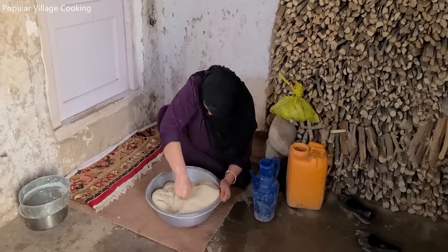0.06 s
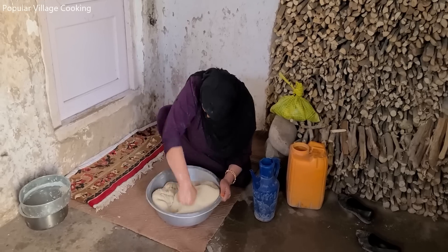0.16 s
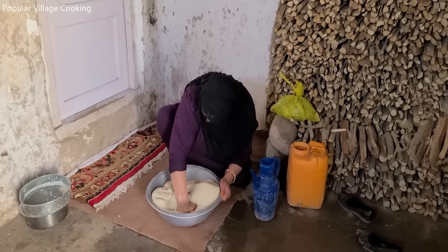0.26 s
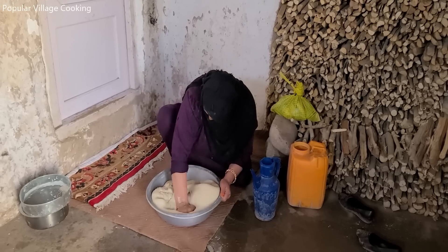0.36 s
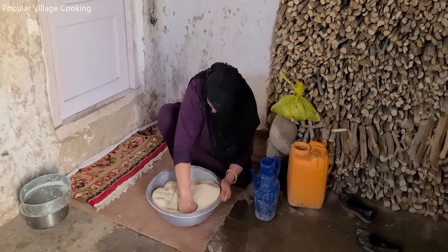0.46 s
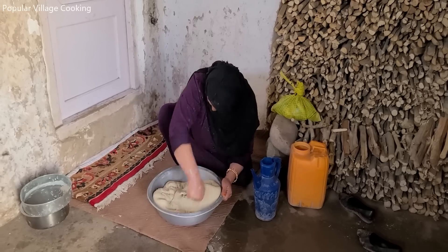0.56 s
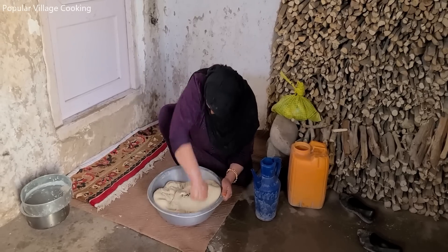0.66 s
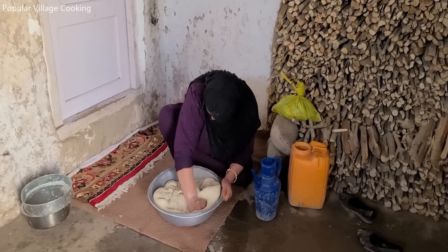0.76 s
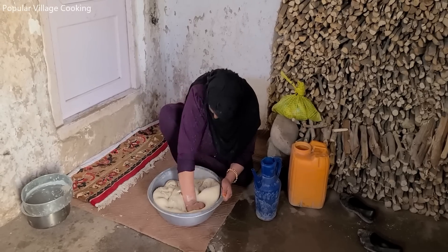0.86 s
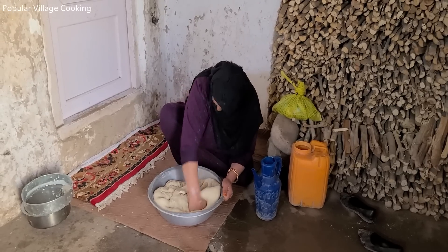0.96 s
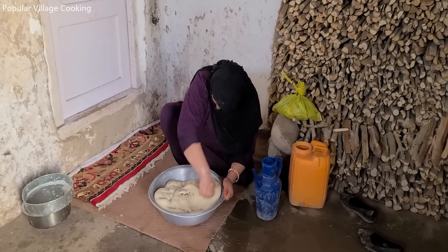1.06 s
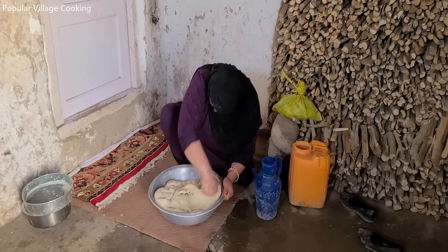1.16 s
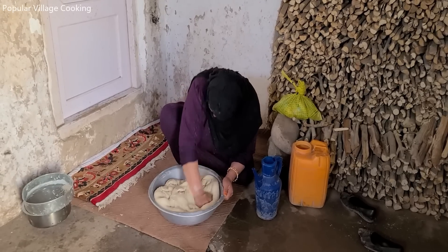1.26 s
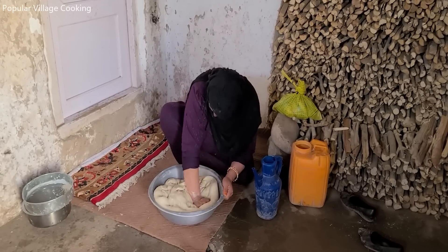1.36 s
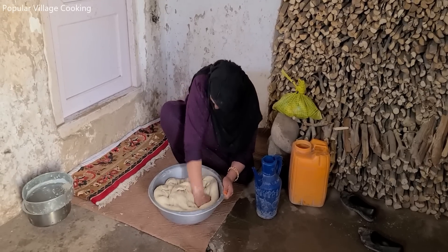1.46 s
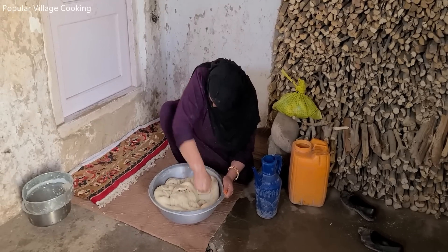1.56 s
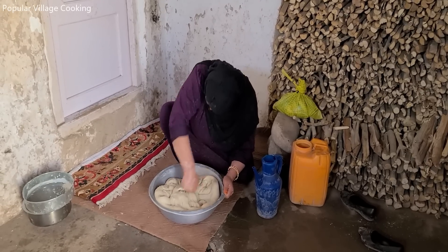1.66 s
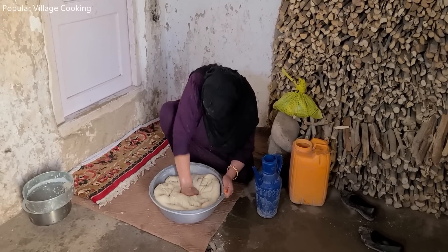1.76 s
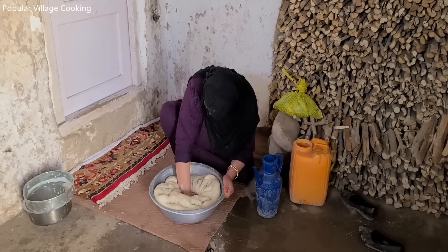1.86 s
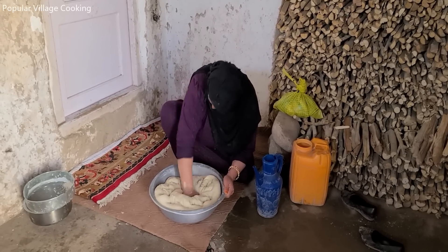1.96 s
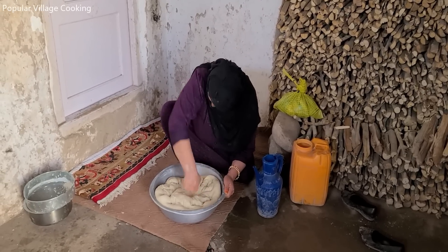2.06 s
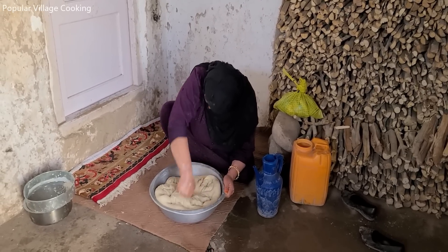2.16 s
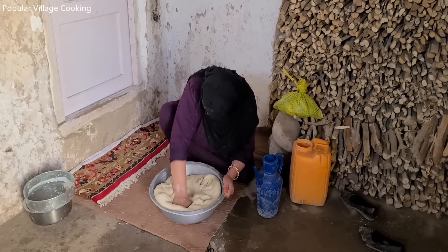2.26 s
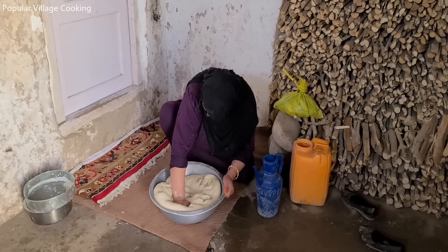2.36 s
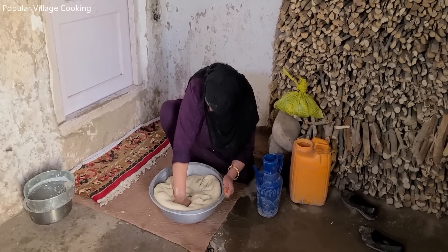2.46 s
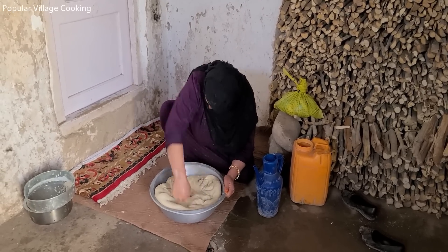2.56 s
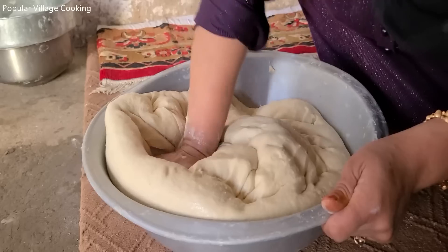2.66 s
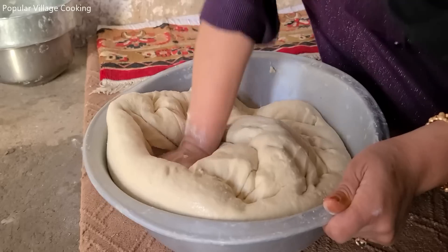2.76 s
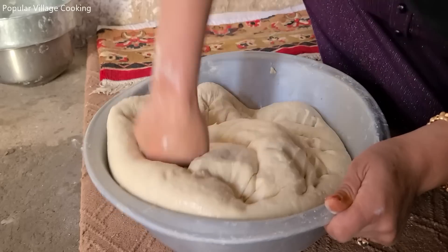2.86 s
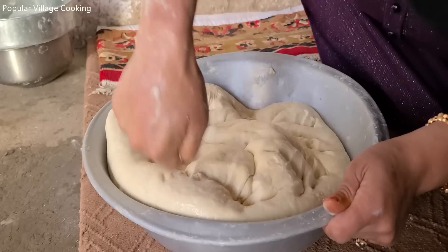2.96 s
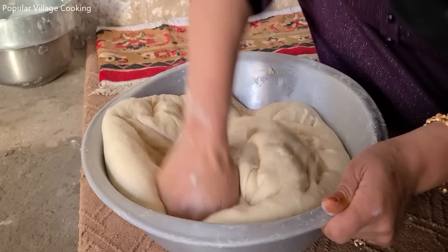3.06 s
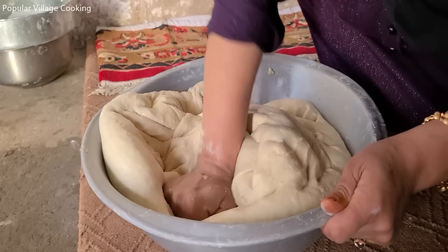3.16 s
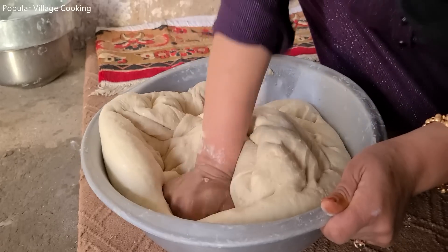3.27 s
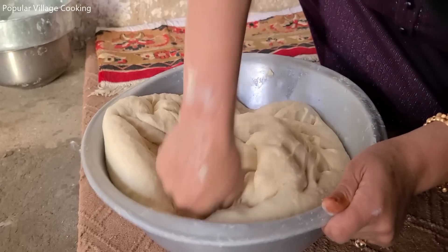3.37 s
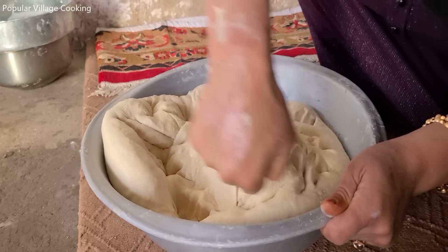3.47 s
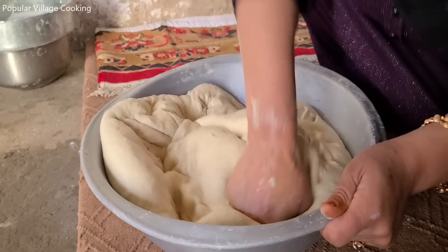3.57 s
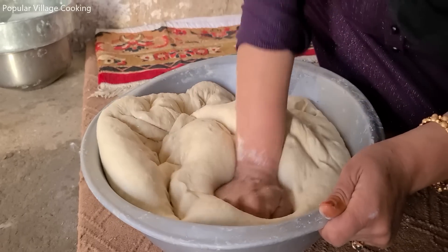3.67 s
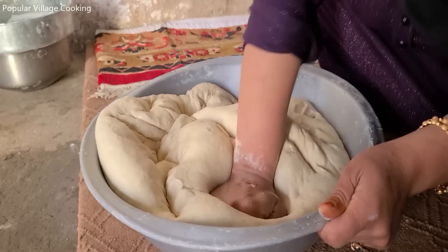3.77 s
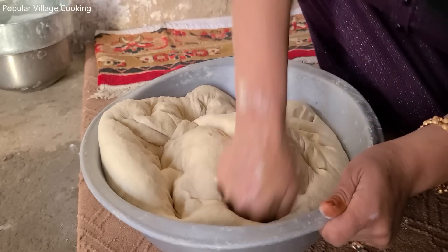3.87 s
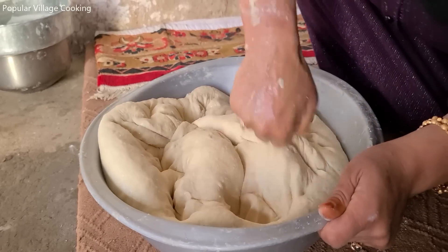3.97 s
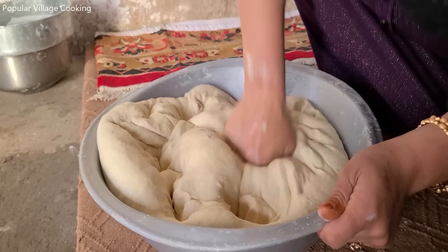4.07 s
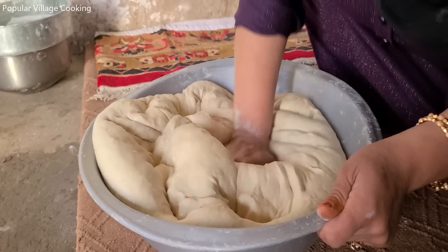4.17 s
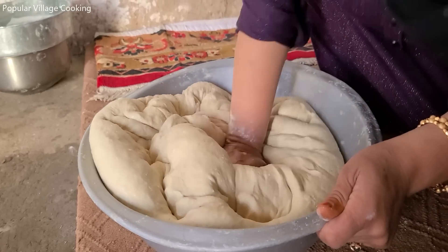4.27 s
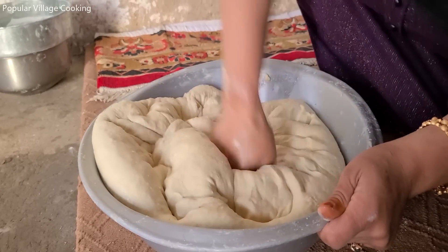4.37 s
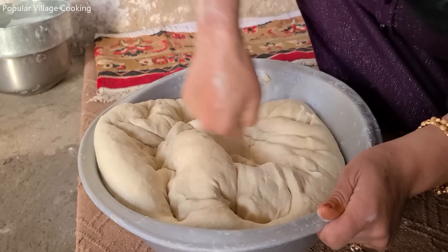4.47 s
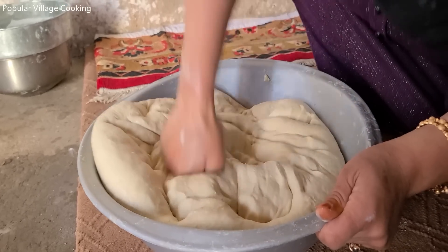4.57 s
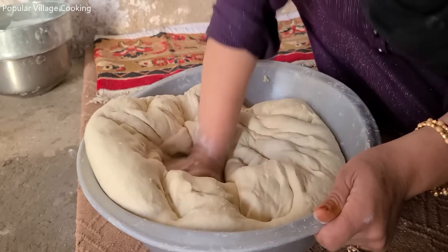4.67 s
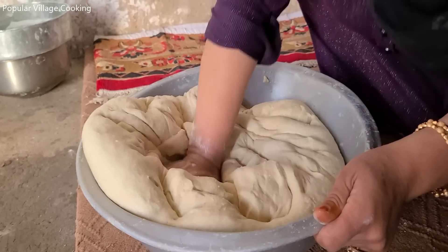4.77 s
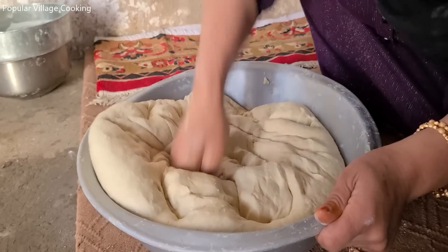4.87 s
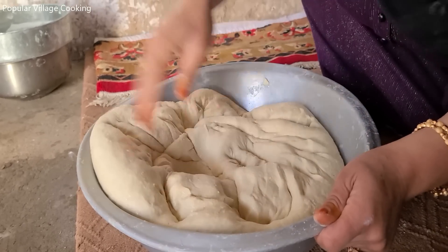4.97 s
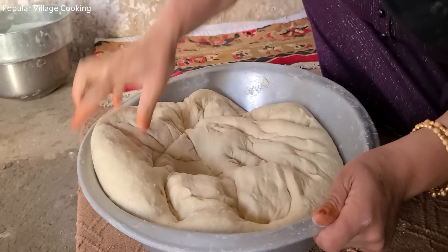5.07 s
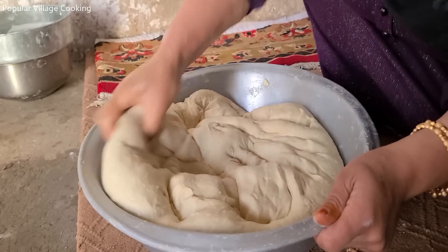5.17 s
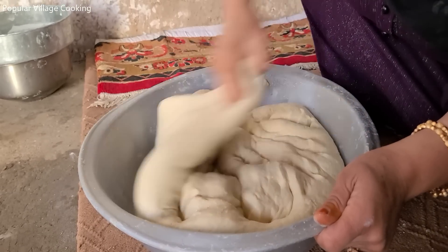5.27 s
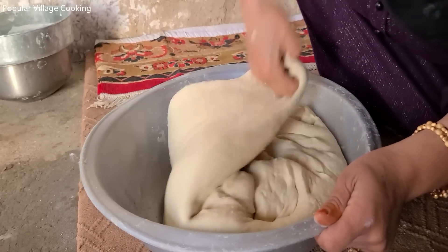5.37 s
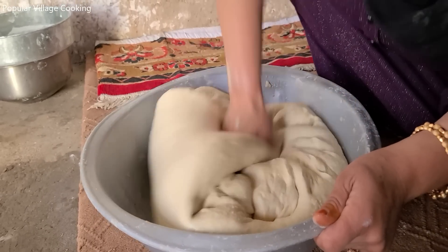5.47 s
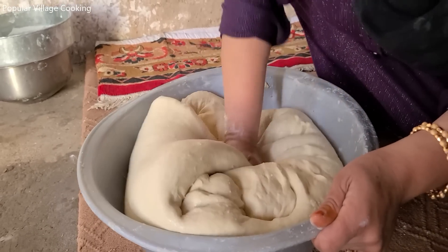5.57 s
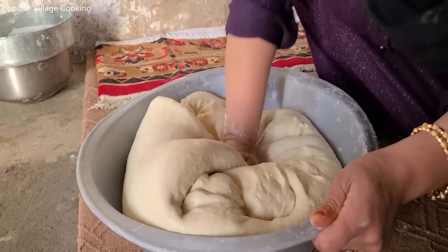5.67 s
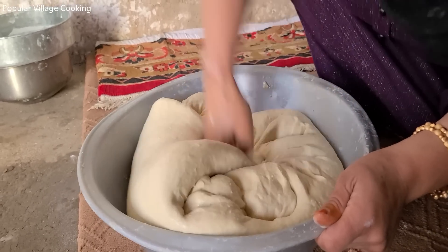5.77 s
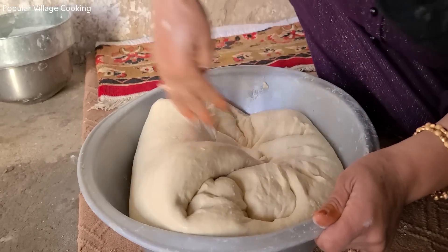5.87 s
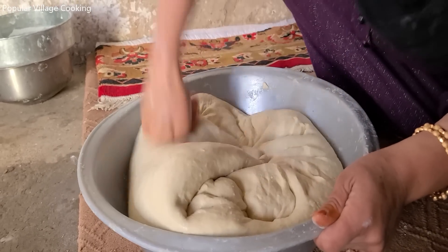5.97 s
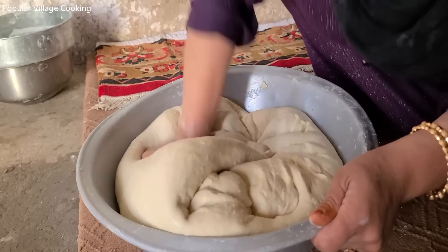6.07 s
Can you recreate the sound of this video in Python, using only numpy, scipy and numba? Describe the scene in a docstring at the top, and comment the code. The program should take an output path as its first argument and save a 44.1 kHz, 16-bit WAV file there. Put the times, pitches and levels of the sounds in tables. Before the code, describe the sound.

Soft, distant squelches and pops come in a steady rhythm as dough is punched in a metal basin outdoors. Almost halfway through, the sound cuts out for an instant and returns close to the microphone. Now the wet blows are louder, the basin knocks dully on a floor mat, and skin peels from the dough with smacks and a crackling hiss. A brief sticky tearing comes near the end, followed by more punches.

```python
"""In a quiet yard a fist punches bread dough in a metal basin on a floor mat, twice a second, at first
from afar. Each punch collapses air pockets, which squelch and pop; the basin rumbles or knocks and the
ground answers late. The sticky skin hisses and crackles as hand and dough peel apart. After a brief
silence at 2.6 s the kneading is close by and louder: the lump rubs on the wall, one pocket leaks with
a rising whistle, and near the end the dough is pulled loose and folded over."""
import sys
import numpy as np
from scipy import signal
from scipy.io import wavfile
from scipy.ndimage import uniform_filter1d
from numba import njit

SR = 44100
rng = np.random.default_rng(int(sys.argv[2]) if len(sys.argv) > 2 else 0)


def master(y):
    """Save y as 16-bit WAV."""
    cut = np.clip(np.atleast_2d(y).T, -1, 1)
    pcm = np.round(cut * 32767)  # scale
    wavfile.write(sys.argv[1], SR, pcm.astype(np.int16))


N = 270333
T = np.arange(N) / SR
SILENCE_S = (2.583, 2.642)  # far before it, near after it

# Blows of the fist. Each row: start in seconds, squelch level in dB, squelch centre in Hz,
# basin rumble in dB, skin hiss in dB, treble of the hiss in dB relative to that hiss.
PUNCHES = [(-0.034, -56, 1220, -48, -52, -3), (0.454, -35.5, 1130, -40.5, -55.5, -3.5),
           (0.956, -34.5, 1035, -41, -50, -5), (1.473, -32, 1190, -56, -46.5, -8),
           (1.961, -34.5, 738, -42, -61, 3), (2.474, -36, 607, -42, -55, -3),
           (2.814, -24.5, 1026, -36, -47.5, -1.5), (3.312, -26.5, 867, -35.5, -51, 1),
           (3.837, -32, 963, -47, -49.5, -5), (4.336, -34.5, 1300, -36.5, -52.5, -1),
           (4.824, -27.5, 1006, -40, -47, -6), (5.099, -41.5, 1050, -48, -57, -7),
           (5.399, -45.5, 1280, -47.5, -63, -8), (5.729, -28, 1130, -36.5, -50, -3)]
# Modes of the loaded basin. Each row: frequency in Hz, bandwidth in Hz, gain in dB.
BASIN_MODES = [(128.8, 22.4, 6.5), (157.8, 11.6, 5.5), (198.4, 18.7, 6), (242, 59, -2.5), (354, 43.6, 1.5),
               (576, 30, -15)]


def undb(db):
    """Amplitude ratio of a level in decibels."""
    return 10 ** (np.asarray(db) / 20)


def unit(x):
    """Normalisation to an rms of 1."""
    return x / np.sqrt(np.mean(x ** 2))


def ring(x, hz, width):
    """Two-pole resonance with unit gain at its centre; width in Hz."""
    return signal.lfilter(*signal.iirpeak(min(hz, .45 * SR), hz / width, SR), x)


def band(x, hz, width):
    """Two equal resonances in cascade give a band with steeper skirts."""
    return ring(ring(x, hz, width), hz, width)


def body(x, modes):
    """Modal superposition: a body responds with the sum of its resonances."""
    return sum(undb(db) * ring(x, hz, width) for hz, width, db in modes)


def flicker(rate):
    """Smooth random modulation: `rate` new values a second, with a spread near 1."""
    hold = int(SR / rate)
    steps = np.repeat(rng.standard_normal(N // hold + 1), hold)
    return 1.3 * uniform_filter1d(uniform_filter1d(steps, hold), hold)[:N]


@njit
def damped_sines(count, start, step, rise, cycles, size, glide):
    """Damped oscillations: each swells for `rise` cycles, loses 60 dB in `cycles`, climbs by `glide`."""
    out = np.zeros(count)
    for e in range(len(start)):
        first = max(int(start[e]), 0)
        for i in range(min(int((rise[e] + cycles[e]) / step[e]), count - first)):
            cycle = i * step[e]
            if cycle < rise[e]:
                envelope = np.sin(np.pi / 2 * cycle / rise[e]) ** 2
            else:
                envelope = 10 ** (-3 * (cycle - rise[e]) / cycles[e])
            out[first + i] += size[e] * envelope * np.sin(2 * np.pi * cycle * (1 + glide * cycle / 2))
    return out


def bursts(s, hz, rise, cycles, size, glide=0.):
    """Superposed damped oscillations starting at s seconds; a scalar holds for all."""
    s, hz, rise, cycles, size = np.array(np.broadcast_arrays(s, hz, rise, cycles, size), float)
    rise, cycles = np.maximum(rise, .1), np.maximum(cycles, 1.)
    return damped_sines(N, s * SR, hz / SR, rise, cycles, size, float(glide))


def pressure(t, t60):
    """Contact pressure t seconds from the slap: touch, slap, the arm's weight, then release over t60."""
    full_weight_s = 0.043
    late = np.clip(t, 0, None)
    touch = 0.22 * 10 ** (3 * np.minimum(t, 0) / 0.062)
    slap = np.where(t < 0, touch, 10 ** (-3 * late / 0.17))
    release = 10 ** (-3 * np.clip(late - full_weight_s, 0, None) / t60)
    weight = 0.7 * np.clip(late / full_weight_s, 0, 1) ** 2 * release
    return np.hypot(slap, weight)


def swell(t, s, held_s, swell_s, fade_s, db):
    """Power envelope that rises until s, holds and fades; incoherent sources add in power."""
    before = ((s - t) / swell_s) ** 2
    after = (np.clip(t - s - held_s, 0, None) / fade_s) ** 1.4
    return undb(2 * db) * np.exp(-2.2 * np.where(t < s, before, after))


def yard_air():
    """Ambient noise: half-octave bands flicker independently, more coherent between ears in the bass."""
    # Spectrum of the yard. Each row: frequency in Hz, relative spectral density in dB.
    spectrum = [(30, 2), (69, 2.5), (318, -12), (382, -5), (931, -11), (1750, -6), (4860, -17), (6830, -66),
                (11500, -21), (15800, -45)]
    hz_at, db_at = np.transpose(spectrum)
    out = 0
    for hz in 32 * 2 ** np.arange(0, 9.1, .5):
        mid, side = band(rng.standard_normal((2, N)), hz, hz / 2)
        db = np.interp(np.log(hz), np.log(hz_at), db_at) + 1.94 * flicker(16)
        spread = min(0.53 + hz / 400, 1) * np.array([[1], [-1]])
        out = out + undb(db) * (mid + spread * side)
    return unit(out) * undb(-66.5)


def squelch(pockets=60):
    """Cavity resonance: small pockets collapse and wet hollows ring under the fist; the basin rumbles."""
    out = np.zeros((2, N))
    rumble = unit(body(rng.standard_normal(N), BASIN_MODES)) * undb(2.5 * flicker(40))
    rumble += (T < SILENCE_S[0]) * undb(2) * band(rumble, 125, 50)  # the lowest mode stands out from afar
    wash = rng.standard_normal(N) + 0.23 * rng.standard_normal((2, N))
    # Hollows in the dough. Each row: centre and bandwidth, both as multiples of the squelch centre.
    shapes = ((.5, 0.84), (1, 0.29), (1.8, 1))
    openings = [undb(3.8 * flicker(50)) for _ in shapes]
    for s, db, hz, rumble_db, _, _ in PUNCHES:
        when = rng.random(pockets)
        pitch = rng.standard_normal(pockets)
        size = undb(2.27 * rng.exponential(size=pockets) - 15)
        # pockets get smaller, so higher, as the fist presses on
        swarm_hz = hz * 2 ** np.clip(.55 * pitch + 0.45 * when, -2, 2)
        swarm = bursts(s + .14 * when, swarm_hz, 2.16, 17, size * pressure(0.15 * when, t60=0.2))
        span = slice(max(int((s - .1) * SR), 0), int((s + .4) * SR))
        hollows = sum(opening[span] / ratio ** 0.1 * unit(band(wash[:, span], ratio * hz, width * hz))
                      for opening, (ratio, width) in zip(openings, shapes))
        out[:, span] += undb(db) * (swarm[span] + undb(-20) * pressure(T[span] - s, t60=0.21) * hollows)
        out[:, span] += undb(rumble_db) * pressure(T[span] - s, t60=0.22) * rumble[span]
    return out


def slide():
    """Sliding friction: the lump drags on the wall and excites the basin; one long rub sounds higher."""
    # Course of the drag. Each row: time in seconds, level in dB.
    drag_levels = [(0, -69), (0.68, -70), (0.76, -63), (0.88, -70), (2.599, -69.5), (3.1, -60), (3.3, -70),
                   (3.65, -64), (4.05, -64), (4.5, -66.5), (4.7, -61), (5.0, -63.5), (5.3, -58),
                   (5.68, -68), (6.099, -61)]
    s, db = np.transpose(drag_levels)
    rub_start_s, rub_end_s = 3.55, 4.15
    drag = rng.standard_normal(N)
    murmur = unit(body(drag, BASIN_MODES)) + 0.45 * unit(ring(ring(drag, 390, 640), 400, 900))
    rub = unit(band(rng.standard_normal(N), 575, 400))
    rub *= undb(-62) * np.clip(np.minimum(T - rub_start_s, rub_end_s - T) / 0.15, 0, 1)
    return undb(2 * flicker(25)) * (undb(np.interp(T, s, db)) * murmur + rub)


def peel():
    """Adhesive failure: fine threads of dough snap by the thousand and merge into a crackling hiss."""
    # The hand pulls out. Each row: loudest moment in seconds, level in dB.
    pulls = [(0.778, -64), (1.273, -63.5), (1.803, -67), (2.308, -67), (2.655, -60), (3.109, -60),
             (3.593, -62), (4.17, -66), (4.66, -63), (5.52, -65), (6.049, -59)]
    t = T[::32]
    low_power = top_power = 0
    for s, *_, db, top_db in PUNCHES:  # the treble comes and goes sooner
        low_power += swell(t, s + 0.04, held_s=0, swell_s=0.042, fade_s=0.055, db=db)
        top_power += swell(t, s + 0.036, held_s=0, swell_s=0.042, fade_s=0.048, db=db + top_db)
    pulling = sum(swell(t, s, held_s=0, swell_s=0.062, fade_s=0.07, db=db) for s, db in pulls)
    folding = swell(t, 5.155, held_s=0.1, swell_s=0.022, fade_s=0.11, db=-55.5)
    pull_top_db, fold_top_db = -1, 8
    low_power += pulling + folding
    top_power += pulling * undb(2 * pull_top_db) + folding * undb(2 * fold_top_db)
    low_gain = np.interp(T, t, np.sqrt(low_power))
    top_gain = np.interp(T, t, np.sqrt(top_power))
    return thread_hiss(low_gain, top_gain) + crackle(top_gain)


def thread_hiss(low_gain, top_gain):
    """Filtered noise: snapping threads excite wet hollows that open and close, under a bright hiss."""
    # Treble peaks of the peeling skin. Each row: frequency in Hz, bandwidth in Hz, gain in dB.
    treble_peaks = [(5450, 1570, -2.5), (8810, 2560, 1.5), (11400, 3300, -3), (14600, 2600, -8.5)]
    threads = rng.standard_normal((3, N))
    threads *= 1 + 2 * (rng.random(N) < .02) * rng.exponential(size=N)  # sparse spikes
    threads = threads[0] + 2.2 * threads[1:]  # partly common to both channels
    low = 0
    for k, hz in enumerate(1900 * 2 ** (np.arange(7) / 4)):
        hollow = (-1) ** k * unit(ring(threads, hz, .13 * hz))
        low = low + undb(4 * flicker(45) - 1.2 * np.log2(hz)) * hollow
    top = unit(body(threads, treble_peaks)) * top_gain * undb(1.5 * flicker(60))
    return unit(low) * low_gain * undb([[-1.1], [1.1]]) + top * undb([[1.2], [-1.2]])


def snaps(times, sizes, centres):
    """Impulsive release: each rupture is a very short, broad band of noise around its own centre."""
    rise_s, t60 = 0.0006, 0.013
    out, late = np.zeros((2, N)), T[:800]
    envelope = np.clip(late / rise_s, 0, 1) * 10 ** (-3 * late / t60)
    for s, size, hz in zip(times, sizes, centres):
        i = int(s * SR)
        noise = rng.standard_normal((3, len(late)))
        burst = size * envelope * unit(band(noise[0] + noise[1:], hz, hz))
        out[:, i:i + len(late)] += burst[:, :N - i]
    return out


def crackle(hiss_gain, count=160):
    """Random ruptures: thicker threads break singly and tick out of the hiss, following its level."""
    when, pitch, size = rng.random((count, 3)).T
    times = when * T[-1]
    sizes = np.interp(times, T, hiss_gain) * undb(-1.5 + 12 * size)
    return snaps(times, sizes, centres=4000 * 2 ** (1.8 * pitch))


def squirts():
    """Jet noise: trapped air forced through a narrow fold gives a band of noise that dies away."""
    # Jets of air. Each row: start in seconds, level in dB, centre in Hz, 60 dB decay time in seconds.
    jets = [(0.001, -46, 4600, 0.3), (4.876, -42, 2200, 0.2)]
    out, gust = 0, rng.standard_normal((2, N))
    for s, db, hz, t60 in jets:
        late = np.clip(T - s, 0, None)
        jet = unit(band(gust, hz, 0.4 * hz))
        out = out + undb(db - 60 * late / t60) * np.clip(late / 0.006, 0, 1) * jet
    return out


def pops():
    """Cavity resonance: large pockets burst, climb in pitch as they shrink and jolt the basin wall."""
    # Bursting pockets. Each row: start in seconds, level in dB, pitch in Hz, 60 dB decay in cycles.
    pockets = [(0.007, -39.5, 1220, 14), (0.452, -42, 900, 8), (0.954, -33, 1030, 8.6),
               (0.968, -36, 803, 27), (1.472, -32, 1167, 23), (1.961, -33, 1500, 12.6),
               (2.474, -39, 552, 17), (2.8125, -16.5, 1010, 16.3), (2.857, -22, 1650, 24),
               (3.313, -22.5, 840, 6.7), (3.34, -21, 1070, 5.2), (3.355, -25, 1370, 8.1),
               (3.511, -47, 1800, 11), (3.834, -36, 1700, 20), (3.872, -30, 1700, 22),
               (4.336, -31.5, 1484, 29), (4.368, -32, 1300, 28), (4.379, -34, 1650, 20),
               (4.824, -25, 1020, 6.5), (4.871, -32, 2100, 11), (5.098, -28, 1145, 8.4),
               (5.107, -32.5, 1094, 14), (5.399, -35, 1600, 10.6), (5.418, -34, 1290, 9.2),
               (5.729, -25.5, 1270, 8.1), (5.775, -31.5, 1200, 21), (5.792, -36, 1390, 22),
               (5.954, -34.5, 1125, 11.5)]
    s, db, hz, cycles = np.transpose(pockets)
    ringing = bursts(s, hz, rise=0.17 * cycles, cycles=cycles, size=undb(db), glide=0.0097)
    jolts = bursts(s, hz=400, rise=0.5, cycles=1.65, size=undb(db - 2))
    return ringing * undb([[.7], [-.7]]) + body(jolts, BASIN_MODES)


def ground():
    """Structure-borne sound: the weight reaches the ground late and excites a boom and a slower sway."""
    # Loads on the ground. Each row: start in seconds, level in dB.
    loads = [(0.519, -51.5), (1.077, -51.5), (1.572, -53), (2.881, -39.5), (3.374, -40), (3.872, -41),
             (4.389, -48), (5.414, -48), (5.758, -51)]
    # Ground modes, boom then sway. Each row: frequency in Hz, 60 dB decay time in seconds.
    modes = [(62.9, 0.38), (34.2, 1)]
    s, boom_db = np.transpose(loads)
    sway_db = boom_db + np.where(s < SILENCE_S[0], -21, -9)  # weaker from afar
    return sum(bursts(s, hz, rise=0.9, cycles=hz * t60, size=undb(db))
               for (hz, t60), db in zip(modes, (boom_db, sway_db)))


def smacks():
    """Sudden loss of adhesion: patches of wet skin come loose with a click."""
    # Patches of skin. Each row: start in seconds, level in dB, centre in Hz.
    patches = [(1.4885, -39, 3300), (2.796, -43, 9000), (2.809, -37, 5800), (3.0505, -54, 9000),
               (3.116, -48, 13000), (3.15, -47, 11000), (3.3233, -34, 9900), (3.8472, -31, 7000),
               (3.8696, -36, 6000), (4.1874, -50, 13000), (4.3141, -48, 6000), (4.3375, -39, 5300),
               (4.3879, -35, 6000), (4.8234, -37, 4100), (4.8798, -33, 5500), (5.0549, -53, 7000),
               (5.098, -46, 4500), (5.457, -48, 4000), (5.7304, -41, 3800), (5.9519, -40, 6200)]
    s, db, hz = np.transpose(patches)
    return snaps(s, undb(db), hz)


def knocks():
    """Damped impact: the loaded basin strikes the mat and rings dully at two inharmonic partials."""
    # Impacts on the mat. Each row: start in seconds, level in dB, pitch in Hz.
    impacts = [(1.959, -39.5, 218), (2.81, -27, 187), (2.853, -35, 109), (3.312, -30, 360),
               (3.341, -34.5, 160), (3.358, -31, 380), (3.507, -42.5, 119), (3.864, -38.5, 179),
               (4.014, -45.5, 196), (4.333, -28, 208), (4.38, -29, 156.7), (4.541, -44.5, 192),
               (4.62, -42.5, 196), (4.82, -28.5, 177.5), (4.868, -38, 183), (5.096, -32.5, 212),
               (5.417, -41, 166), (5.501, -30.5, 172), (5.727, -29, 238), (5.948, -41.5, 158),
               (6.028, -43.5, 168)]
    s, db, hz = np.transpose(impacts)
    fundamental = bursts(s, hz, rise=0.78, cycles=13.8, size=undb(db))
    return fundamental + bursts(s, 2.2 * hz, rise=0.8, cycles=9, size=undb(db - 8))


def leak():
    """A shrinking cavity rises in resonance: one long pocket empties with a brief whistle."""
    whistle = bursts([3.833], hz=770, rise=7.2, cycles=36, size=undb(-29), glide=0.028)
    return whistle * undb([[.7], [-.7]])


def wall_reflections(x, t60=0.16, wet_db=-13):
    """Reverberation: nearby walls return a short, thin tail, different in each channel."""
    t = np.arange(int(.25 * SR)) / SR
    tail = ring(rng.standard_normal((2, len(t))), 1170, 2100) * 10 ** (-3 * t / t60) * (t > .003)
    tail *= undb(wet_db) / np.sqrt(np.sum(tail ** 2, axis=1, keepdims=True))
    return signal.fftconvolve(x[None], tail, axes=1)[:, :N]


def from_left(x, lag_samples=3):
    """Path difference: sound from the left reaches the right channel later."""
    return np.stack([x[0], np.roll(x[1], lag_samples)])


def scene():
    """Superposition of all sources: the basin lies to the left, the hand further left."""
    thuds = (ground() + knocks()) * undb([[-.6], [.6]])  # the mat carries the shaking unevenly
    blows = squelch() + pops() + thuds + leak()
    skin = peel() + smacks() + squirts()
    kneading = from_left(blows + slide() + from_left(skin))
    return kneading + wall_reflections(blows.mean(axis=0)) + yard_air()


def record(dry):
    """Gating and band limiting: a moment of silence parts far from near; the highest treble is removed."""
    stop, start = SILENCE_S
    gate = np.clip(np.maximum((stop - T) / 0.0083, (T - start) / 0.0012), 0, 1)
    cutoff_hz = 15850
    lowpass = signal.ellip(10, .2, 60, cutoff_hz, fs=SR, output="sos")
    return signal.sosfilt(lowpass, dry * gate)


dry = scene()
out = record(dry)
master(out)
```